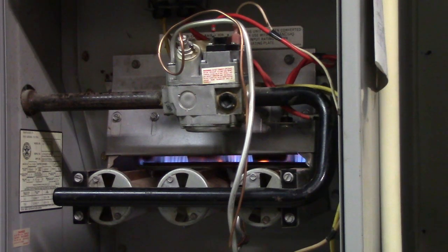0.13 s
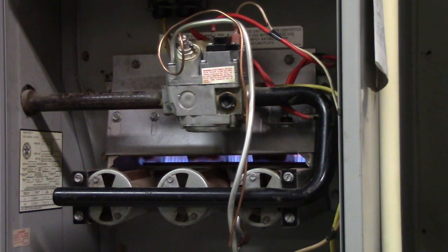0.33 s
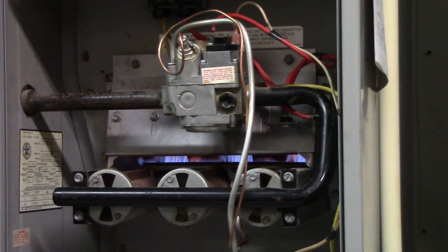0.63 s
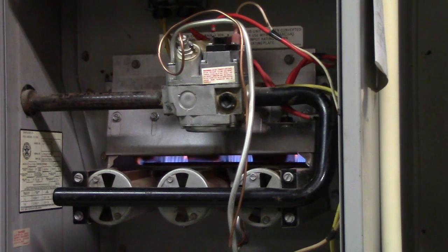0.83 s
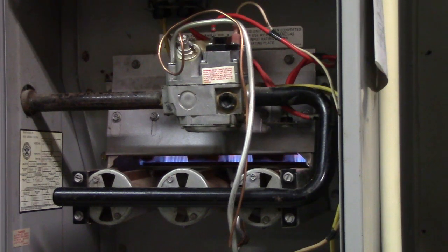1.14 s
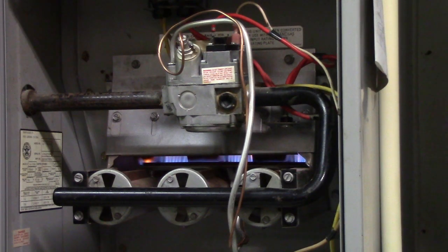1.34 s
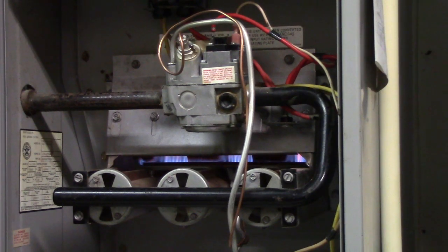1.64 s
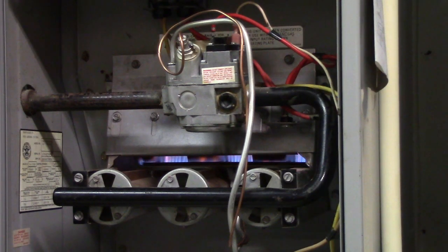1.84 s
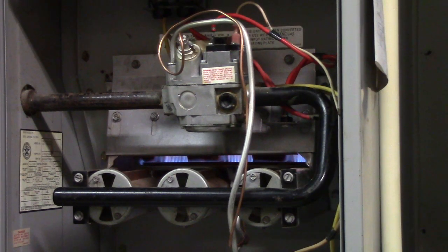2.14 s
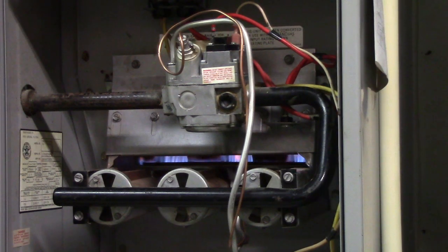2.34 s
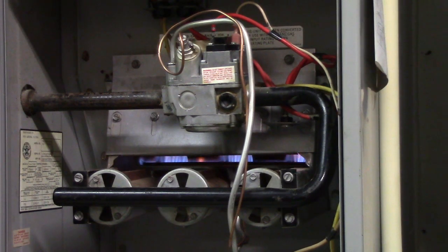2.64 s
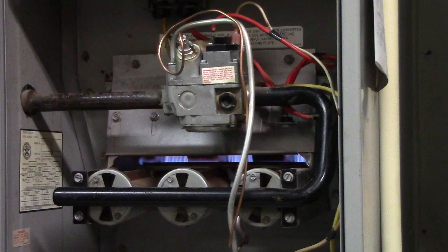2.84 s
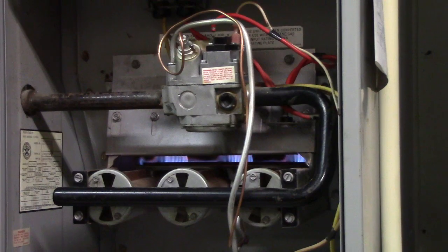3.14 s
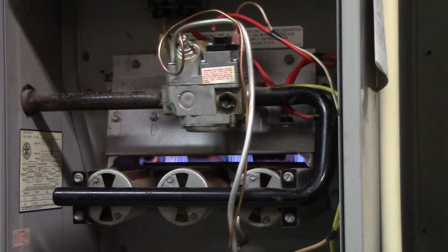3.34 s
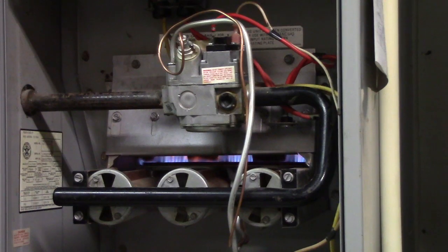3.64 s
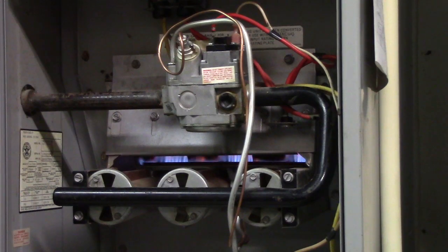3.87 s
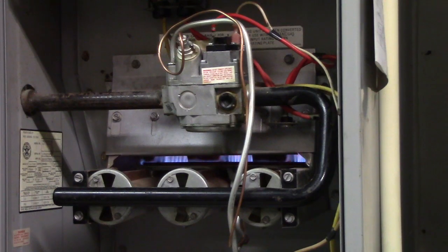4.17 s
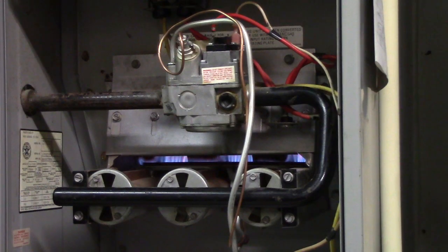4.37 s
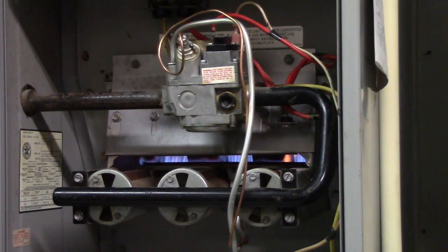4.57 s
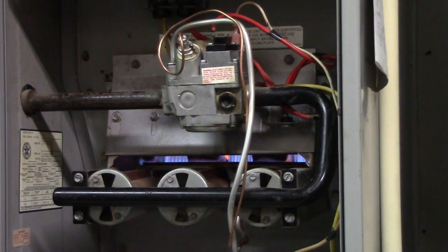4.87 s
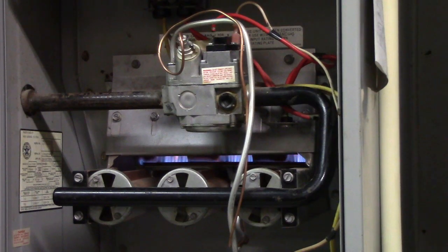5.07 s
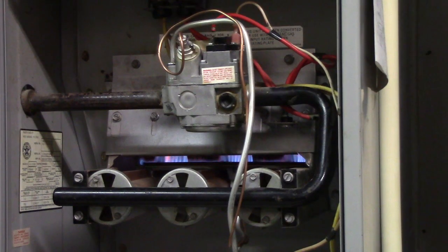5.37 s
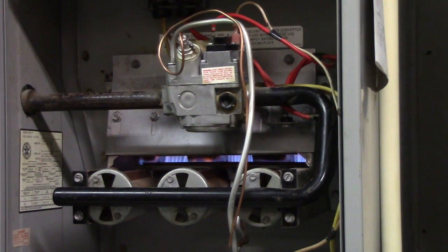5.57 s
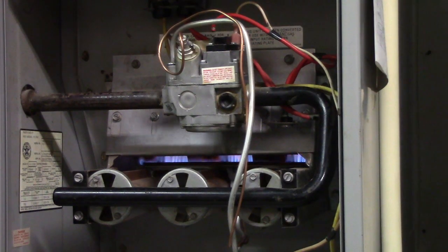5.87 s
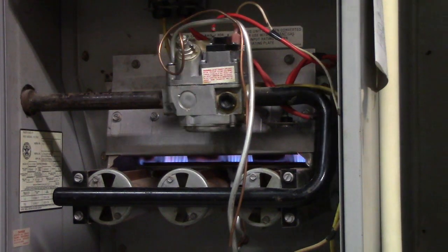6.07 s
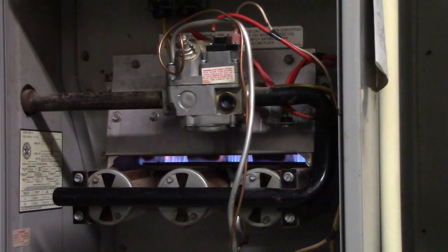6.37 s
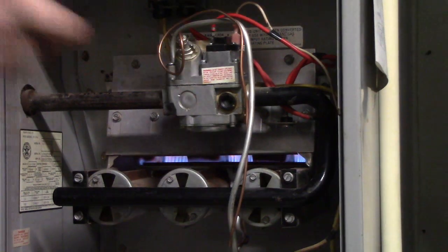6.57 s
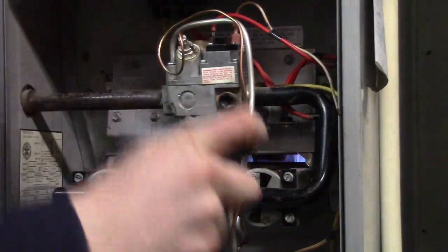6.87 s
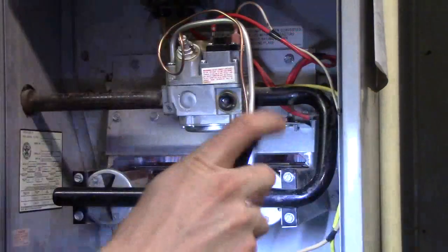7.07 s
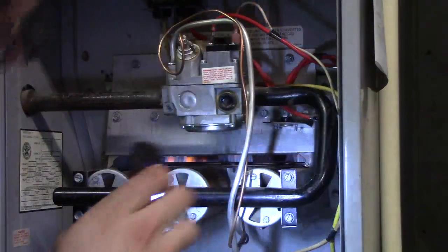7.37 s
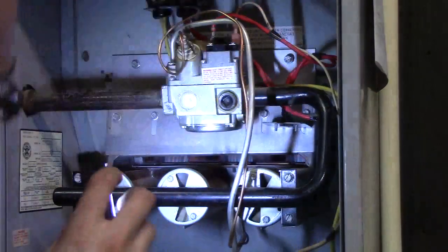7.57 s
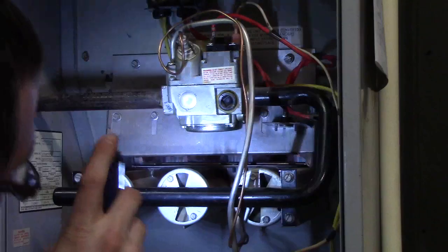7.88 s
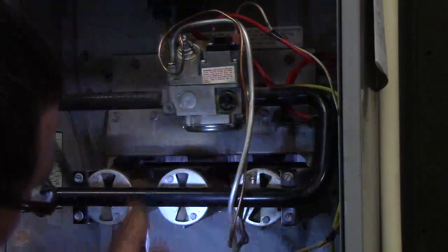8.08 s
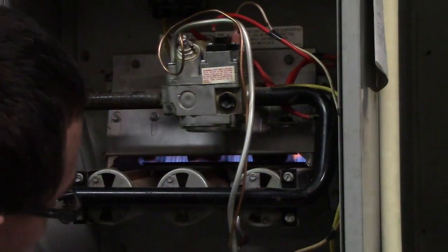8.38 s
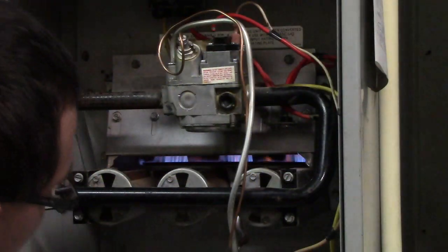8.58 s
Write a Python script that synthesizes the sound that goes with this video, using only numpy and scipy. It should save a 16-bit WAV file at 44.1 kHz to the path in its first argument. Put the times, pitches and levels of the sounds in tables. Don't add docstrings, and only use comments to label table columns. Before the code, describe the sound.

A steady, slightly fluttering gas flame hiss fills a small hard room, heard close to the burners. Someone walks up with soft booming thuds and shoe creaks, digs through clattering tools, drags and scrapes them, and pulls one loose with a hard bang and throbbing metallic shriek. A torch switch clicks sharply on, and later off, with the flames hissing on underneath, very slightly muffled as the person leans in.

```python
import sys
import numpy as np
from scipy import signal
from scipy.fft import rfft, irfft, next_fast_len
from scipy.io import wavfile

SR = 44100
rng = np.random.default_rng(int(sys.argv[2]) if len(sys.argv) > 2 else 0)


def convert_level_to_amplitude(level_db):
    exponent = np.asarray(level_db, float) / 20
    return 10 ** exponent


def to_wav(s):
    ch = np.atleast_2d(s).T
    pcm = np.round(np.clip(ch, -1, 1) * 32767)
    wavfile.write(sys.argv[1], SR, pcm.astype(np.int16))


N = 384111
STEADY_TOP_HZ = 15770


def rms_one(x):
    return x / np.sqrt(np.mean(x ** 2) + 1e-20)


def coloured(spectrum, peaks=(), size=N):
    fast = next_fast_len(size)
    hz = np.fft.rfftfreq(fast, 1 / SR) + 1
    corner_hz, corner_db = np.transpose(spectrum)
    db = np.interp(np.log(hz), np.log(corner_hz), corner_db)
    for centre_hz, width_hz, peak_db in peaks:
        db = db + peak_db * np.exp(-.5 * (2 * (hz - centre_hz) / width_hz) ** 2)
    noise = rfft(rng.standard_normal(fast))
    return rms_one(irfft(noise * convert_level_to_amplitude(db), fast)[:size])


def band(x, low_hz, high_hz):
    return signal.sosfilt(signal.butter(2, [low_hz, high_hz], "band", fs=SR, output="sos"), x)


def cut_below(x, low_hz):
    return signal.sosfilt(signal.butter(2, low_hz, "high", fs=SR, output="sos"), x)


def cut_above(x, top_hz):
    return signal.sosfilt(signal.ellip(16, .5, 75, top_hz, fs=SR, output="sos"), x)


def resonate(x, hz, width_hz):
    r = np.exp(-np.pi * width_hz / SR)
    feedback = [1, -2 * r * np.cos(2 * np.pi * hz / SR), r * r]
    return signal.lfilter([(1 - r * r) / 2, 0, (r * r - 1) / 2], feedback, x)


def drift(rate_hz):
    r = np.exp(-2 * np.pi * rate_hz / SR)
    return rms_one(signal.lfilter([1], [1, -2 * r, r * r], rng.standard_normal(N + SR))[SR:])


def dying(t60, rise=0.0002, size=SR // 3):
    t = np.arange(size) / SR
    fall_db = np.maximum(-60 * t / max(t60, .003), -200)
    return (1 - np.exp(-t / rise)) * convert_level_to_amplitude(fall_db)


def add(track, s, peak_db, sound):
    part = track[round(s * SR):][:len(sound)]
    part += convert_level_to_amplitude(peak_db) * sound[:len(part)] / np.max(np.abs(sound))


def flames():
    # hz, level_db (per Hz)
    flame = [(30, -34), (90, -32), (180, -24.8), (340, -16.6), (620, -23.2), (1300, -12.8), (2400, -18.0),
             (3900, -25.6), (5600, -16.3), (7600, -18.0), (8400, -23.6), (10200, -21.1), (13000, -21.6),
             (15800, -22.8)]
    # centre_hz, width_hz, peak_db (above the broad colour)
    tubes = [(680, 350, 11.5), (850, 70, 9.5), (847, 20, 5.0), (1090, 24, 3.5), (1050, 180, 5.9),
             (1350, 70, 2.7), (1680, 140, 6.0), (2050, 420, 4.5), (2360, 60, 3.6), (2610, 130, 9.7),
             (2850, 110, 9.3), (3130, 100, 13.0), (3490, 410, 9.7), (3720, 90, 8.9), (4020, 220, 10.8),
             (4290, 80, 6.9), (4530, 330, 11.2), (4970, 150, 6.6), (5210, 80, 8.4), (5410, 210, 6.4),
             (5810, 180, 4.1)]
    # centre_hz, width_hz, peak_db
    jets = [(6110, 110, 5.0), (6440, 80, 2.6), (7400, 90, 3.7), (7920, 90, 4.4), (8080, 160, 7.2),
            (8430, 360, 9.4), (8660, 420, 3.0), (9190, 420, 5.8), (9970, 120, 3.9), (10580, 100, 4.0),
            (10950, 70, 3.6), (11190, 140, 4.7), (11460, 60, 3.3), (11690, 370, 6.3), (12280, 170, 7.6),
            (12650, 130, 8.7), (12970, 110, 5.5), (13230, 160, 5.5), (13510, 140, 6.4), (13910, 160, 12.7),
            (14100, 130, 8.4), (14260, 90, 9.2), (14410, 70, 6.0), (14940, 200, 6.4), (15250, 100, 7.3),
            (15690, 110, 6.5)]
    # centre_hz, width_hz, share taken away (below 0 a gap fills in)
    muffled = [(856, 52, .4), (2630, 68, 0), (2880, 68, 0), (3100, 78, 0.26), (8430, 400, .25),
               (10300, 1600, -.15), (14050, 500, .35)]
    # peak_s, peak_db
    dust = [(0.1094, -34), (0.2394, -35), (0.3531, -32), (0.4594, -37), (0.5856, -32), (0.7244, -34),
            (1.0914, -31), (1.2494, -34), (1.4441, -32), (1.6152, -30.5), (1.7993, -34), (1.9194, -35.5),
            (2.1535, -35), (2.3594, -34), (2.5494, -36), (2.7995, -32), (2.9886, -33), (3.267, -32.5),
            (3.4294, -35), (4.1794, -33.5), (5.1944, -34), (5.5794, -38), (5.887, -34), (6.1344, -41),
            (7.0894, -34), (7.5694, -34), (7.9279, -34), (8.0564, -32), (8.6994, -30)]
    flame_db, muffle_s, muffle_span_s = -45.5, 6.97, 0.21
    shade_db, shade_s, shade_span_s = -1, 6.9, .3

    t = np.arange(N) / SR
    hiss = coloured(flame, tubes + jets)
    near = (1 + np.tanh((t - muffle_s) / muffle_span_s)) / 2
    hiss = hiss - near * sum(share * resonate(hiss, hz, width_hz) for hz, width_hz, share in muffled)
    top = cut_below(hiss, 3400)
    shading_db = shade_db * (1 + np.tanh((t - shade_s) / shade_span_s)) / 2
    flare = np.zeros(N)
    for s, db in dust:
        add(flare, s - .004, db - 16.0, np.hanning(round(0.016 * SR)))
    spits = flare * rms_one(band(rng.standard_normal(N), 7000, 10800))
    roar = convert_level_to_amplitude(.5 * drift(9)) * (hiss - top)
    top = convert_level_to_amplitude(shading_db + 0.23 * drift(18)) * top
    return convert_level_to_amplitude(flame_db) * (roar + top) + spits * convert_level_to_amplitude(.5 * shading_db)


def apart():
    rumble_db, patch_db = -92, -65
    out = convert_level_to_amplitude(rumble_db) * rms_one(band(rng.standard_normal(N), 30, 210))
    for s, low_hz in rng.uniform([0, 4200], [8.6, 13800], (30, 2)):
        patch = band(rng.standard_normal(2048), low_hz, low_hz + 1800)
        patch = band(patch, low_hz, low_hz + 1800)
        add(out, s, patch_db + 13, patch * np.hanning(2048))
    return out


def footsteps():
    # start_s, peak_db, slap_db (against the thud), decay_s
    footfalls = [(0.578, -59, 10, .19), (1.114, -41.5, -10, 0.25), (1.546, -41.5, -5, 0.12),
                 (1.599, -47, 3, 0.2), (1.882, -44.5, 2, 0.42), (2.204, -36, -4, 0.15),
                 (2.532, -40.5, 3, 0.2), (2.569, -46.5, -10, 0.36), (2.884, -39.5, 5, 0.23),
                 (2.948, -46, 3, 0.57), (3.194, -38.5, -7, 0.27), (3.225, -45.5, -6, 0.27),
                 (3.608, -41, -9, 0.26), (4.156, -39.5, 6, 0.17), (4.395, -48, 15, 0.25),
                 (4.716, -39, -1.5, 0.17), (5.299, -44.5, 3, 0.056), (5.978, -52.5, 16.5, 0.16),
                 (6.799, -50, 10, 0.32), (6.868, -46, 4, 0.47), (6.955, -45, 6.5, 0.32)]
    # hz, level_db (per Hz)
    thud = [(35, -51), (60, -42), (168, -5.5), (366, 1.5), (455, -5.5), (658, -2), (700, -5.5), (910, -20),
            (1540, -120)]
    # start_s, peak_db, pitch_hz, decay_s
    step_rings = [(2.212, -41, 1090, .1), (2.888, -42, 1114, .07), (3.612, -44, 356, 0.08),
                  (4.160, -46, 342, 0.08), (4.718, -37, 307, 0.095), (4.735, -44, 227, 0.059),
                  (6.002, -38, 620, 0.035), (6.011, -32.5, 407, 0.013), (6.025, -44, 490, 0.029),
                  (6.042, -39, 298, 0.027)]
    boom_db, boom_loss_db_per_s = -11, 3

    out = np.zeros(N)
    for s, db, slap_db, t60 in footfalls:
        add(out, s, db, coloured(thud, size=SR // 3) * dying(t60, rise=0.004))
        slap, boom = rng.standard_normal((2, SR // 3))
        add(out, s, db + slap_db, band(slap, 356, 1700) * dying(t60, rise=0.00098))
        floor_db = db + boom_db - boom_loss_db_per_s * s
        add(out, s, floor_db, band(boom, 76, 180) * dying(0.25, rise=0.038))
    for s, db, hz, t60 in step_rings:
        add(out, s, db, band(resonate(dying(0.0031), hz, 3.0 / t60), 216, 1500))
    return out


def room(x):
    t60_s, top_t60_s = 0.31, 0.21
    low, high = rng.standard_normal((2, SR // 2))
    tail = band(low, 36, 2750) * dying(t60_s, 0.012, size=SR // 2)
    tail += 0.98 * band(high, 2200, 18000) * dying(top_t60_s, 0.0035, size=SR // 2)
    return signal.fftconvolve(x, tail / np.sqrt(np.sum(tail ** 2)))[:N]


def knocks():
    # start_s, peak_db, ring_hz, decay_s
    rummage = [(3.018, -40, 1760, .05), (3.731, -22.5, 1490, 0.053), (3.732, -25, 2700, .04),
               (3.740, -21, 1200, 0.06), (3.747, -19.5, 1300, 0.06), (3.755, -18, 1150, 0.07),
               (3.756, -21, 3630, .04), (3.761, -12, 1190, 0.025), (3.766, -24, 1700, .04),
               (3.788, -30, 950, 0.047), (3.800, -30, 1090, .04), (3.812, -38, 1100, 0.033),
               (3.860, -24, 1650, 0.044), (3.861, -29.5, 3880, .03), (3.905, -34, 1000, .04),
               (3.918, -35, 750, .05), (3.891, -31, 1790, .044), (3.959, -26, 2350, .044),
               (3.968, -29.5, 2000, 0.07), (4.026, -31, 2390, .03), (4.040, -34, 1690, .04),
               (4.041, -27.5, 3000, 0.034), (4.158, -33.5, 1710, .04), (4.185, -39, 1480, .05),
               (4.382, -20, 2960, 0.024), (4.387, -20.5, 3100, 0.077), (4.388, -28.5, 1020, 0.06),
               (4.417, -16.5, 2180, 0.036), (4.442, -26.5, 1890, 0.033), (4.566, -24, 2220, 0.043),
               (4.637, -24, 2470, 0.031), (4.690, -25, 2210, 0.054), (4.714, -21, 925, 0.016),
               (4.726, -30, 1160, .063)]
    # start_s, peak_db, ring_hz
    settle = [(4.853, -36, 1510), (4.953, -33, 2440), (5.005, -35, 1930), (5.036, -39, 925),
              (5.064, -32.5, 1720), (5.105, -27.5, 1520), (5.14, -28, 1570), (5.183, -29, 1900),
              (5.219, -30, 1460), (5.278, -35, 1460), (5.385, -29, 2650), (5.391, -36, 3950),
              (6.144, -40, 1530), (6.137, -42, 850), (6.241, -33, 2300), (6.246, -30, 1540),
              (6.252, -32, 3080), (6.261, -29, 960), (6.272, -41, 830), (6.282, -33, 1410)]
    # start_s, peak_db, ring_hz
    pull = [(6.451, -22, 1000), (6.463, -24, 760), (6.473, -26, 4100), (6.474, -20, 1060),
            (6.490, -19, 1000), (6.493, -11, 760), (6.497, -19, 1050), (6.504, -13, 800),
            (6.503, -23, 2500), (6.513, -20, 7200), (6.519, -16, 7000), (6.528, -16, 1310),
            (6.542, -5.5, 1370), (6.557, -20, 1200), (6.569, -15, 990), (6.578, -19, 890),
            (6.588, -15, 1420), (6.597, -23, 1190), (6.611, -18, 780), (6.626, -31, 900),
            (6.636, -26, 1410), (6.645, -28, 1200), (6.661, -27, 1510), (6.672, -35, 2020),
            (6.683, -32, 1410)]
    # start_s, peak_db, ring_hz, decay_s, crack_db
    heavy = [
        (3.753, -28, 1100, 0.033, -2),
        (6.447, -23, 4500, 0.02, -8),
        (6.536, -3, 2580, 0.019, -27),
        (6.54, -4, 2530, 0.023, -18),
        (6.55, -3.5, 2540, 0.021, -2),
    ]
    settle_t60_s, pull_t60_s = 0.081, 0.044
    crack_at_1500_hz_db, crack_db_per_octave = -16, 1
    first_contact = 4.8
    ring_sharpness = 5.7

    out, size = np.zeros(N), SR // 6
    light = []
    for s, db, hz, t60 in (rummage + [(*row, settle_t60_s) for row in settle]
                           + [(*row, pull_t60_s) for row in pull]):
        crack_db = crack_at_1500_hz_db + crack_db_per_octave * np.log2(hz / 1500)
        light.append((s, db, hz, t60, crack_db))
    for blows, broad, rise in ((light, .2, .0003), (heavy, .6, .0012)):
        for s, db, hz, t60, crack_db in blows:
            contacts = rng.standard_normal(size) * dying(t60, rise, size=size)
            contacts[8] += first_contact
            body = resonate(contacts, hz, hz / ring_sharpness)
            body = body + broad * band(contacts, 0.45 * hz, 2.02 * hz)
            add(out, s, db - 1.0, body)
            add(out, s, db + crack_db, band(contacts * dying(t60, size=size), 3900, 9600))
    return out


def drags():
    # peak_s, peak_db, body_hz, rise_s (per 20 dB), fall_s (per 20 dB)
    dragged = [(3.740, -36, 1124, -0.24, -3), (3.866, -41, 1290, -0.5, 0.04), (3.900, -41, 893, -0.16, 0.4),
               (3.968, -38, 2300, -0.1, .14), (4.045, -42.5, 1440, 0.5, 0.34),
               (6.212, -50.5, 1480, 0.8, .05), (6.252, -39, 1480, -0.44, .05),
               (6.282, -41.5, 1280, 0.1, .06)]
    slides = [(5.108, -36.5, 1477, .008, 0.12), (5.145, -33, 1400, .07, .08),
              (5.188, -39.5, 1395, .05, 0.1), (5.218, -39.5, 1390, 0.054, 0.089),
              (5.253, -43.5, 1427, 0.043, 0.11), (5.280, -37.5, 1434, .08, 0.028),
              (5.390, -32.5, 1700, 0.015, 0.047)]
    jerks = [
        (6.440, -35, 1110, 0.042, 0.016),
        (6.458, -29.5, 837, 0.0099, 0.18),
        (6.492, -18.5, 900, 0.006, 0.073),
    ]
    scrapes = [(3.760, -37.5, 1146, 0.012, 0.05), (6.420, -43, 1170, 0.036, .06),
               (6.448, -24.5, 1110, 0.0018, 0.021), (6.536, -16, 1416, 0.011, 0.081),
               (6.556, -22.5, 1407, 0.029, 0.11)]
    bites = [(6.518, -25, 990, 0.02, 0.018)]
    kinds = ((dragged, (-5, -18, -9.5)), (slides, (-21, -33, -25)), (jerks, (-7.5, -27, -7)),
             (scrapes, (1, -15, -8.5)), (bites, (-2, -4, -2)))
    sag_per_s = .8

    grains = rng.standard_normal(N) * convert_level_to_amplitude(2.5 * drift(58))
    broad = rms_one(band(band(grains, 590, 2520), 590, 2520))
    bright = rms_one(band(grains, 2470, 5700))
    spray = rms_one(band(grains, 11000, 12800))
    rumble = rms_one(band(band(grains, 204, 690), 204, 690))
    slow = rms_one(signal.sosfilt(signal.butter(2, 300, fs=SR, output="sos"), grains))
    out = np.zeros(N)
    for rows, (bright_db, spray_db, rumble_db) in kinds:
        rub = 0.74 * broad + convert_level_to_amplitude(bright_db) * bright + convert_level_to_amplitude(spray_db) * spray + convert_level_to_amplitude(rumble_db) * rumble
        for s, db, hz, rise, fall in rows:
            span = np.arange(round((s - 2 * rise) * SR), round((s + 2 * fall) * SR))
            t = span / SR - s
            body = slow[span] * np.sin(2 * np.pi * hz * (t - sag_per_s * t ** 2 / 2))
            envelope = convert_level_to_amplitude(db - 3.5 - 20 * np.maximum(-t / rise, t / fall))
            out[span] += envelope * (rub[span] + 0.81 * body)
    return out


def squeal():
    # centre_s, level_db, length_s
    throbs = [(6.519, -34, 0.0084), (6.54, -30, 0.012), (6.565, -9.5, 0.008), (6.575, -20, 0.0058),
              (6.583, -21, 0.0061), (6.591, -11, 0.006), (6.6, -26, .005), (6.61, -20, 0.0053),
              (6.619, -34, .008), (6.637, -36, .004), (6.643, -33, .0045), (6.655, -41, .0046),
              (6.674, -43, 0.0055), (6.69, -51, 0.0062), (6.726, -48, 0.009)]
    # time_s, pitch_hz
    glide = [(6.5, 3650), (6.55, 3530), (6.565, 3495), (6.68, 3456)]
    octave_start_db, octave_loss_db_per_s, upper_db = -18.5, 166, -12
    after_ring_hz, after_ring_width_hz, after_ring_db = 3432, 13, -3

    hz = np.interp(np.arange(N) / SR, *np.transpose(glide))
    phase = 2 * np.pi * np.cumsum(hz * (1 + 0.0147 * drift(310))) / SR
    chatter = 0.85 + 0.5 * drift(350)
    out = np.zeros(N)
    for s, db, length in throbs:
        octave_db = octave_start_db - octave_loss_db_per_s * (s - throbs[0][0])
        double_db = octave_db + upper_db
        span = slice(round((s - .03) * SR), round((s + .03) * SR))
        t = np.arange(N)[span] / SR - s
        p = phase[span]
        overtones = convert_level_to_amplitude(octave_db) * np.sin(2 * p)
        overtones += convert_level_to_amplitude(double_db - 8) * np.sin(3 * p) + convert_level_to_amplitude(double_db) * np.sin(4 * p)
        tone = convert_level_to_amplitude(db) * np.sin(p) + chatter[span] * overtones
        out[span] += np.sqrt(2) * np.exp(-.5 * (2 * t / length) ** 2) * tone
    return out + convert_level_to_amplitude(after_ring_db) * resonate(out + 1e-18, after_ring_hz, after_ring_width_hz)


def torch():
    # start_s, peak_db, decay_s, echo_db, crack_db
    clicks = [
        (6.825, -13, 0.023, -13.5, -21.5),
        (6.987, -12.5, 0.025, -10, -11),
        (8.18, -11, 0.018, -14, -23.5),
        (8.346, -4, 0.01, -23.5, -23.5),
    ]
    # pitch_hz, width_hz, level_db
    case_modes = [
        [(1620, 160, 4.5), (2830, 310, 3.5), (4600, 140, 4), (7300, 700, 0.5), (7700, 130, -12),
         (10300, 240, -17)],
        [(2650, 240, 10), (3820, 610, 9.5), (7040, 190, -13), (7700, 170, -8), (9000, 980, 1.5),
         (10200, 160, -27)],
        [(2290, 220, 0), (3170, 230, 3.5), (6400, 200, -15), (6860, 280, 1), (8550, 270, -8), (11800, 250, -27)],
        [(3760, 160, 5), (6630, 270, 3), (7630, 410, 4), (9330, 240, -2), (12100, 180, -19), (14000, 210, -18)],
    ]
    hard_contact = 6.5

    cracks, rings = np.zeros((2, N))
    for (s, db, t60, echo_db, crack_db), modes in zip(clicks, case_modes):
        noise = rng.standard_normal(SR // 3)
        noise[12] += hard_contact
        broad_echo = convert_level_to_amplitude(echo_db + 6.5) * dying(0.13, rise=0.0016)
        case = 0.25 * band(noise * (dying(t60) + broad_echo), 2060, 10000)
        for k, (hz, width_hz, mode_db) in enumerate(modes):
            echo_t60 = 0.19 * (2500 / hz) ** .5
            snap = noise * (dying(t60) + convert_level_to_amplitude(echo_db + 2.0) * dying(echo_t60, rise=0.0013))
            case = case + convert_level_to_amplitude(mode_db) * (-1) ** k * resonate(snap, hz, 1.9 * width_hz)
        add(rings, s, db - 1.5, case)
        add(cracks, s, db + crack_db + 13.5, band(noise * dying(0.0027), 7500, 12000))
    soft_cut = signal.cheby2(12, 60, 17400, fs=SR, output="sos")
    return cut_above(rings, STEADY_TOP_HZ) + signal.sosfilt(soft_cut, cracks)


def soft_limit(pressure):
    return pressure + cut_below(.85 * np.tanh(pressure / .85) - pressure, 200)


def scene():
    tools = cut_below(cut_below(knocks() + drags(), 257), 80)
    handled = cut_below(cut_below(footsteps(), 76), 66) + tools
    shriek = squeal()
    echoes = convert_level_to_amplitude(-9.5) * room(handled + 0.5 * shriek)
    pressure = flames() + handled + shriek + echoes
    return cut_above(soft_limit(pressure), STEADY_TOP_HZ) + torch() + apart() * [[1], [-1]]


def band_limit(x):
    return signal.sosfilt(signal.butter(12, 16820, fs=SR, output="sos"), x)


def record(dry):
    return band_limit(dry)


dry = scene()
out = record(dry)
to_wav(out)
```